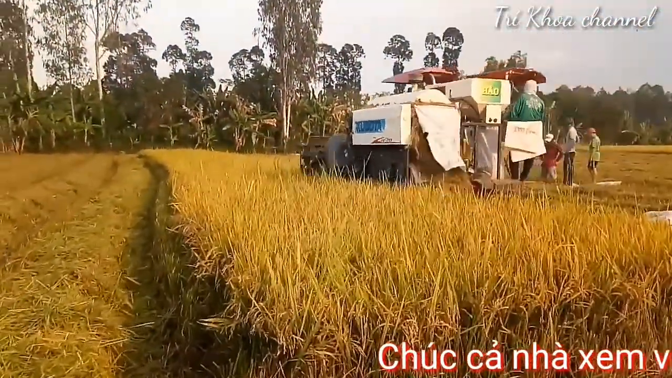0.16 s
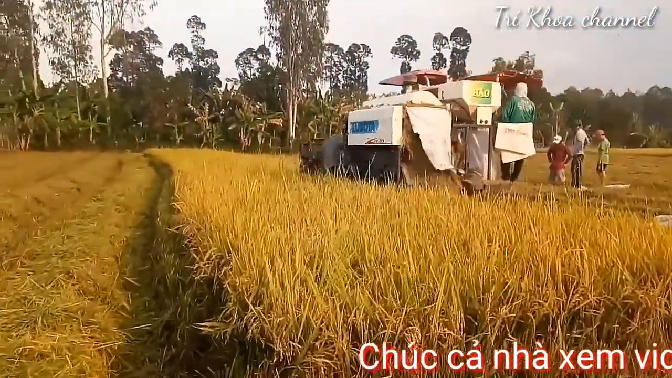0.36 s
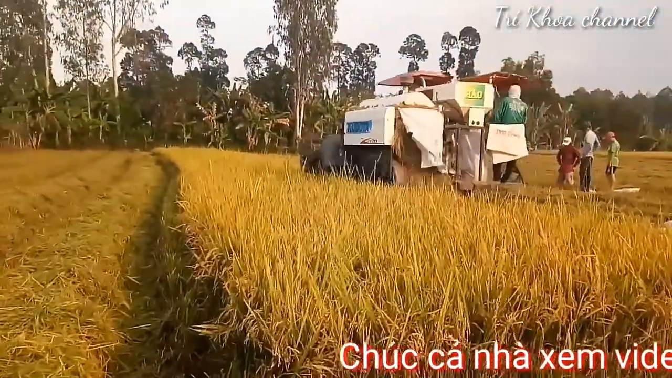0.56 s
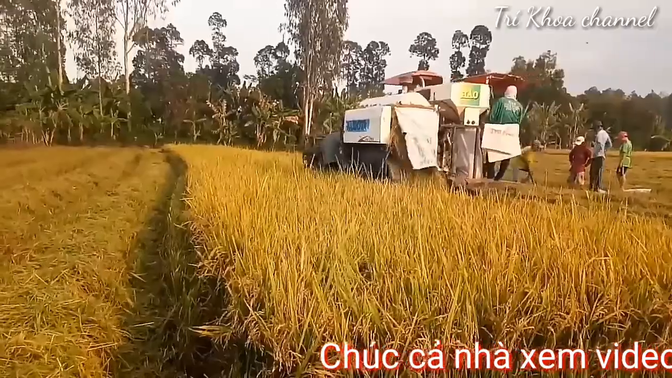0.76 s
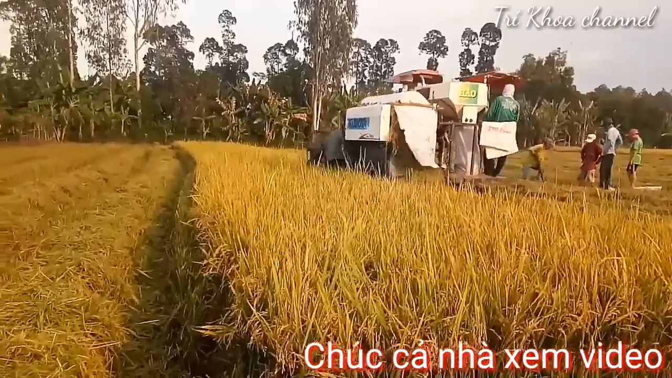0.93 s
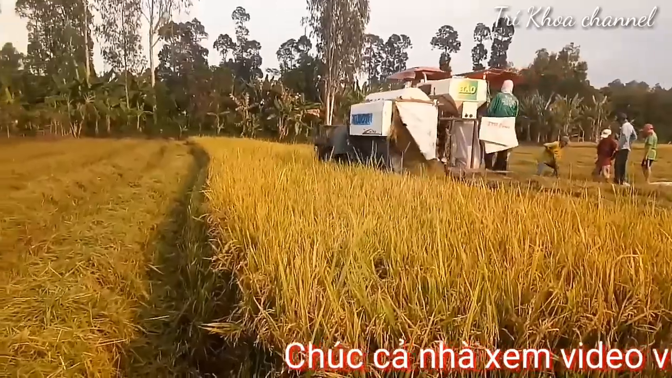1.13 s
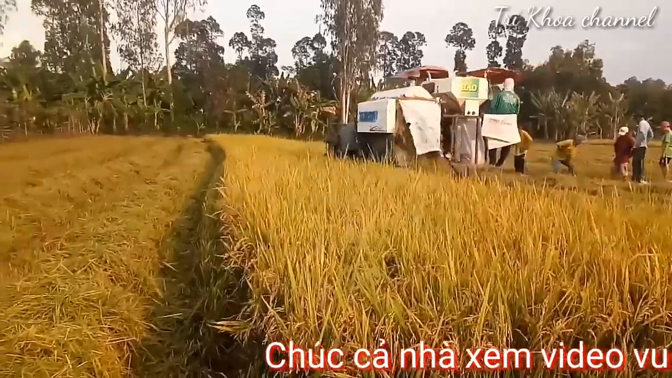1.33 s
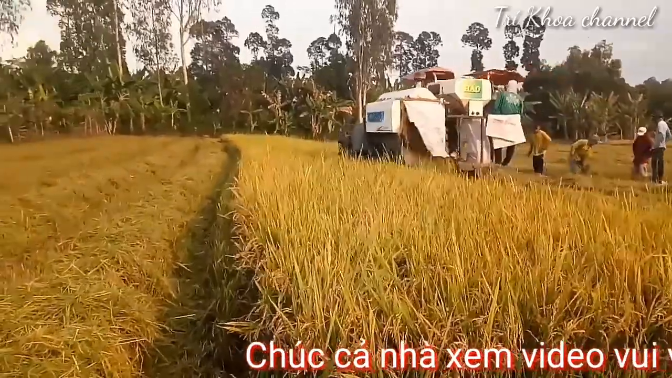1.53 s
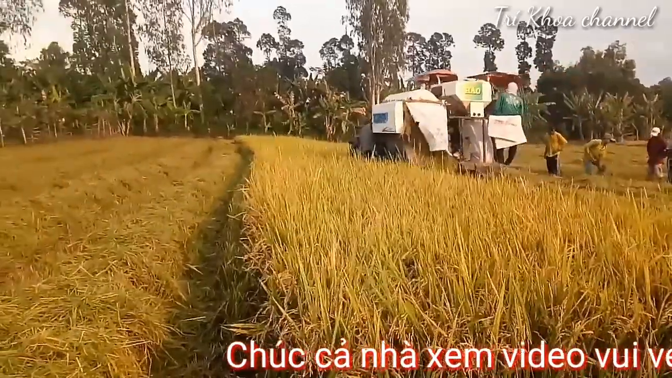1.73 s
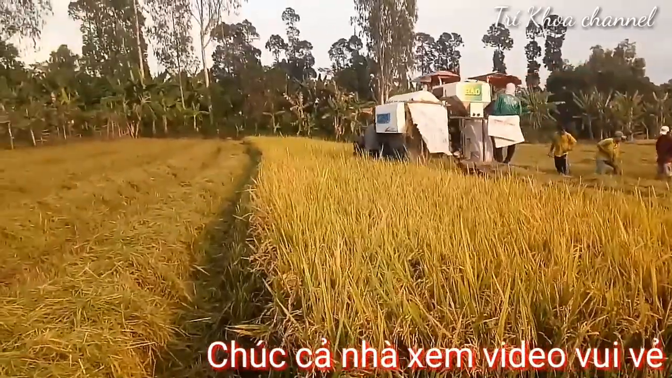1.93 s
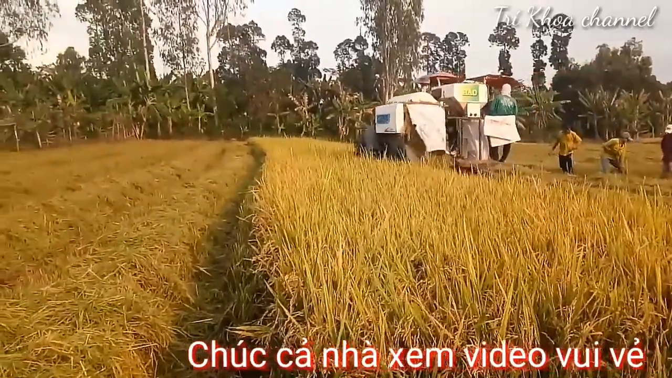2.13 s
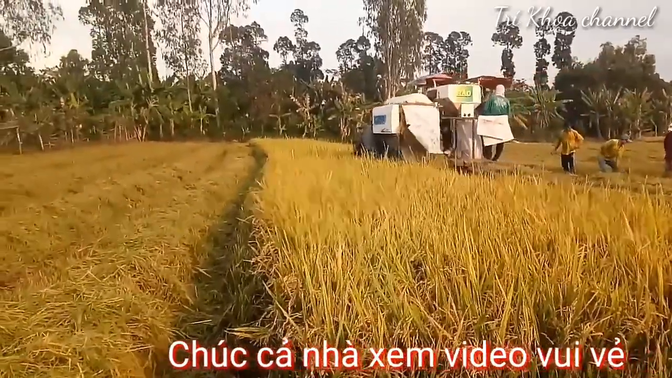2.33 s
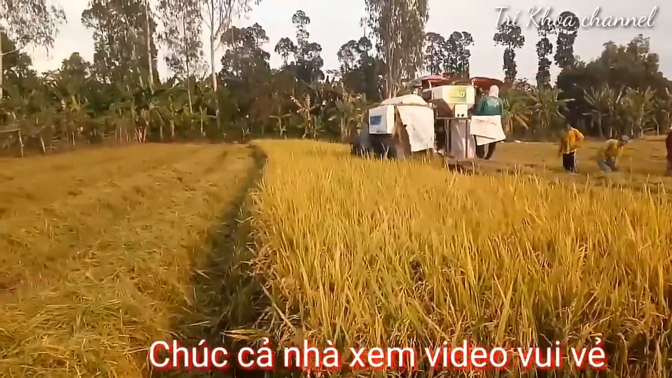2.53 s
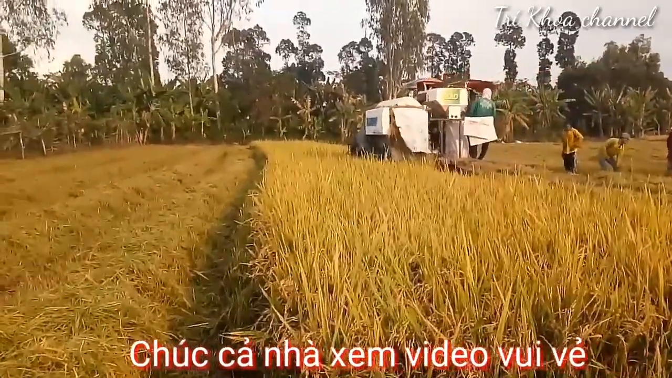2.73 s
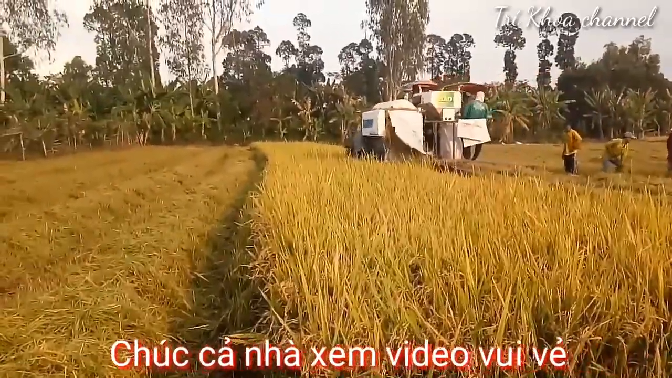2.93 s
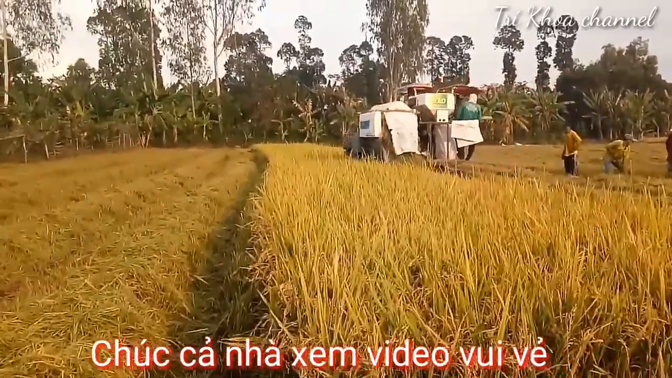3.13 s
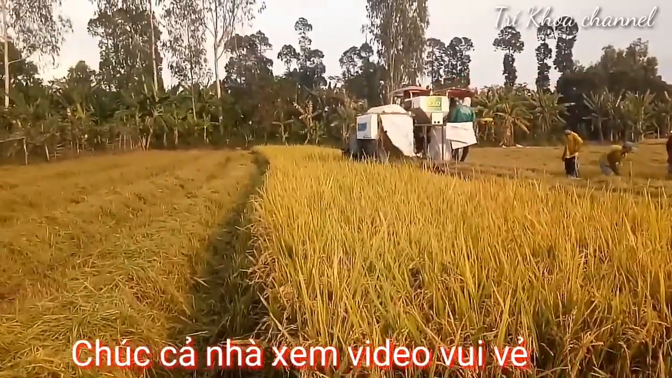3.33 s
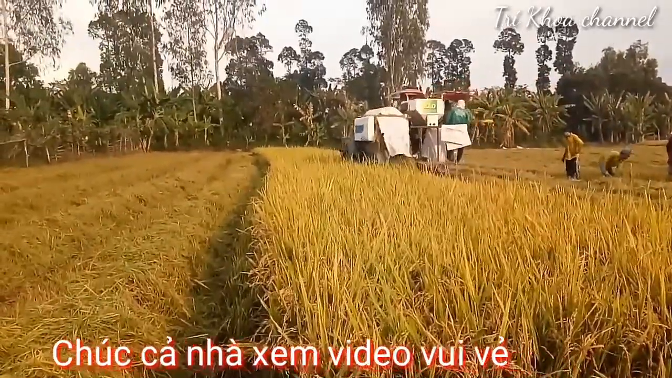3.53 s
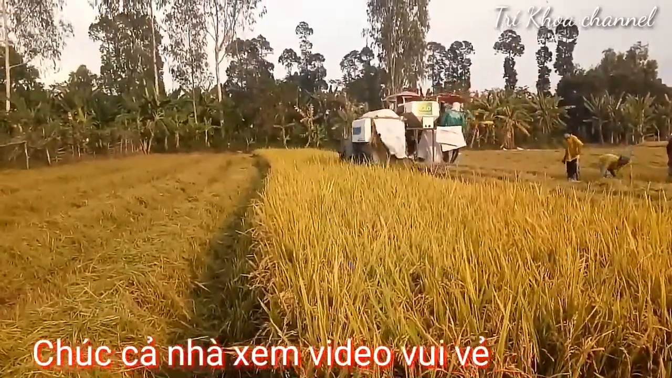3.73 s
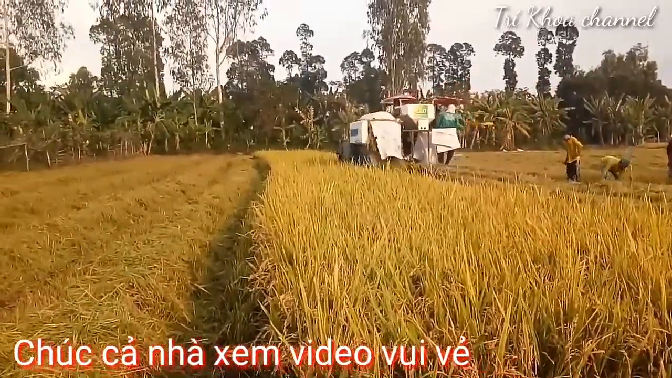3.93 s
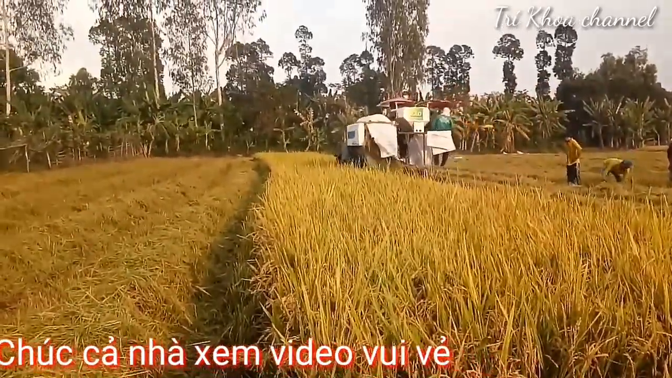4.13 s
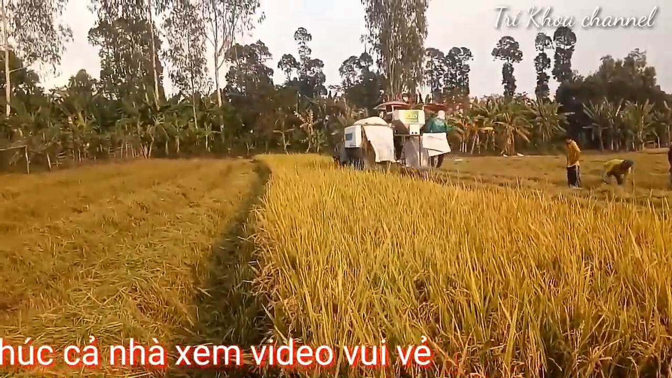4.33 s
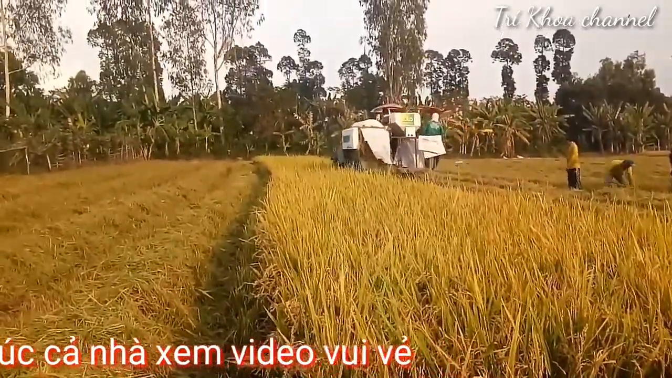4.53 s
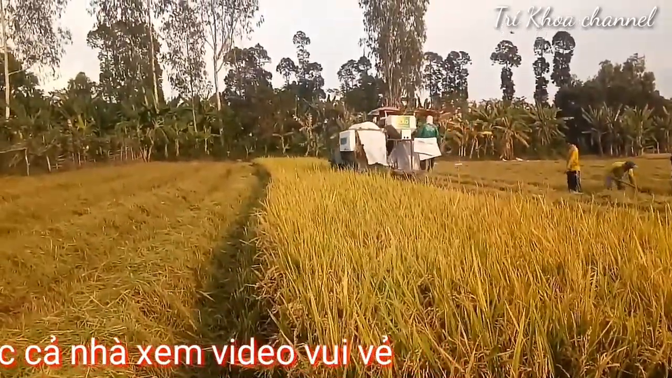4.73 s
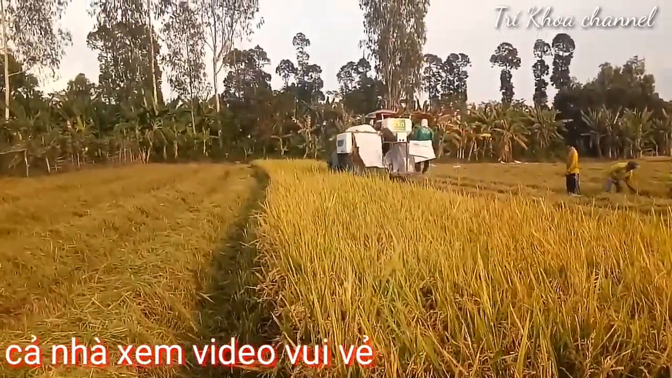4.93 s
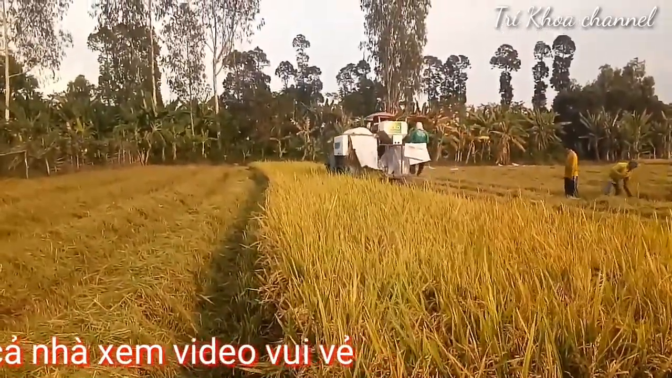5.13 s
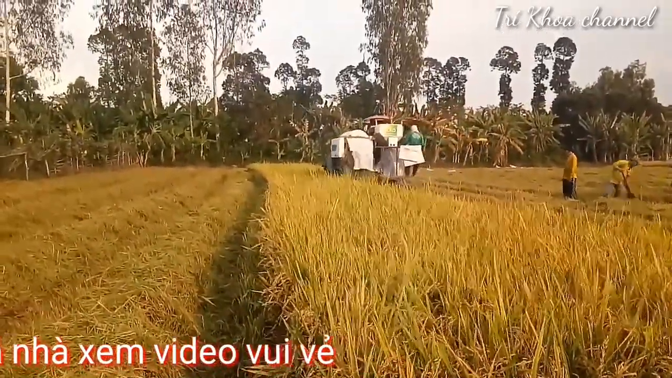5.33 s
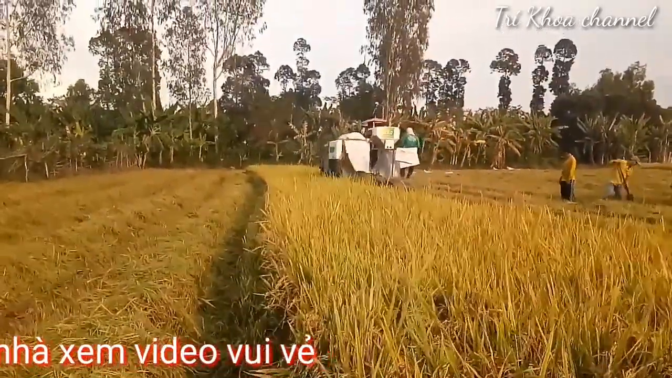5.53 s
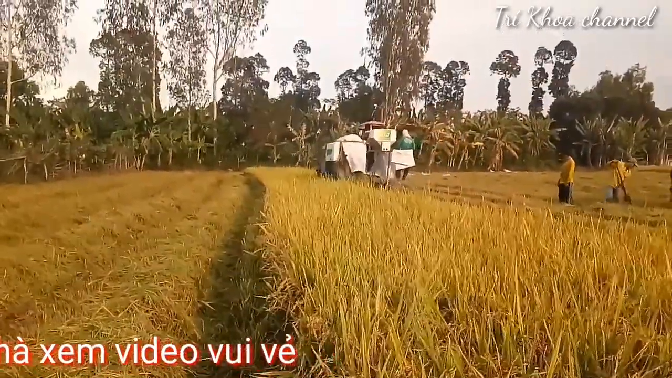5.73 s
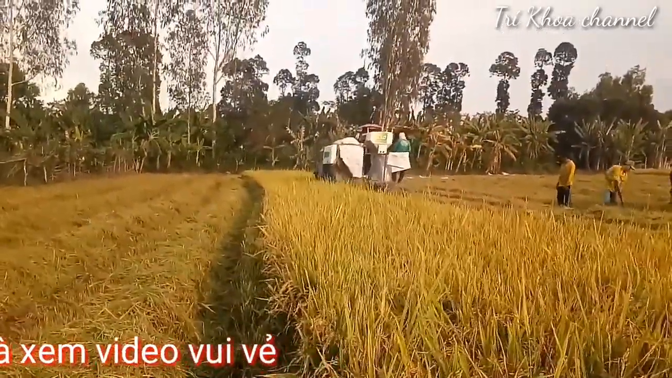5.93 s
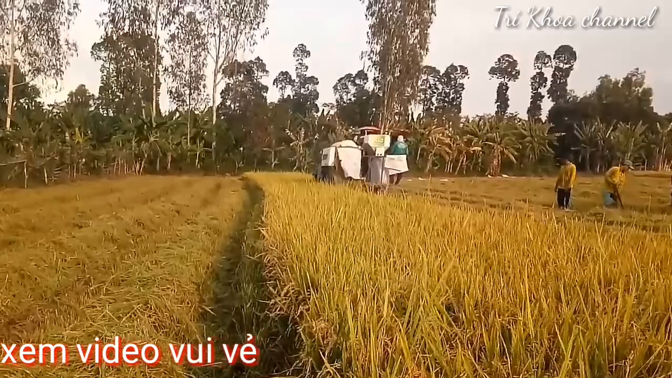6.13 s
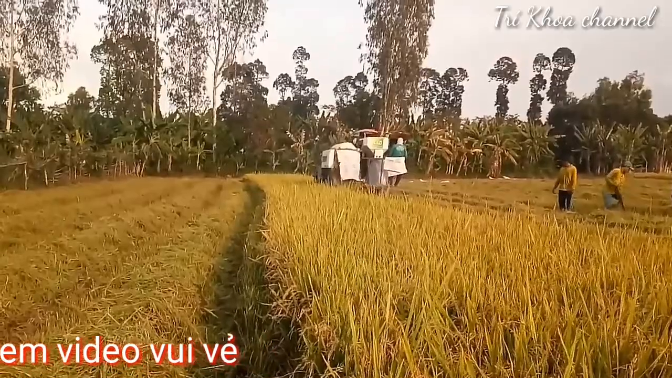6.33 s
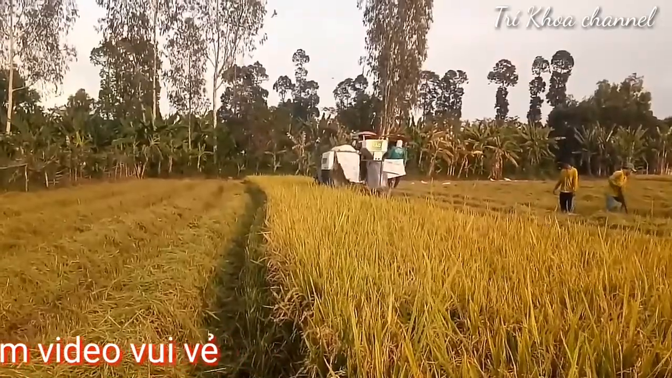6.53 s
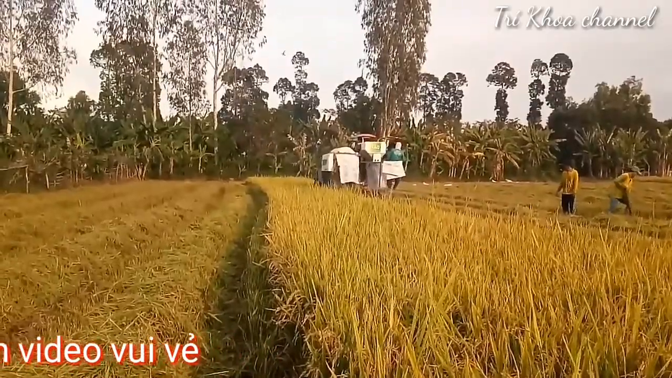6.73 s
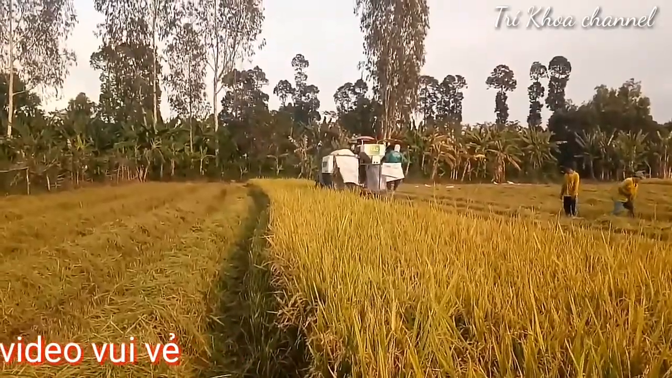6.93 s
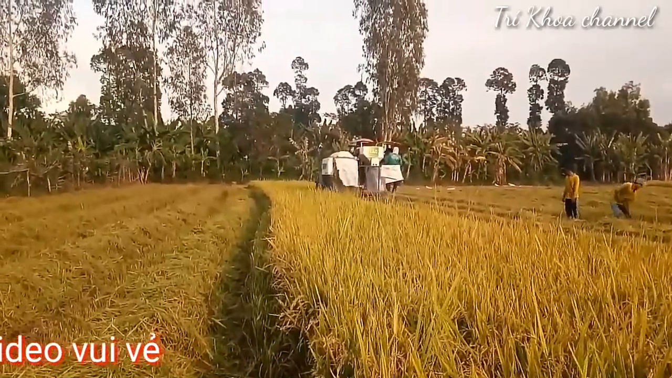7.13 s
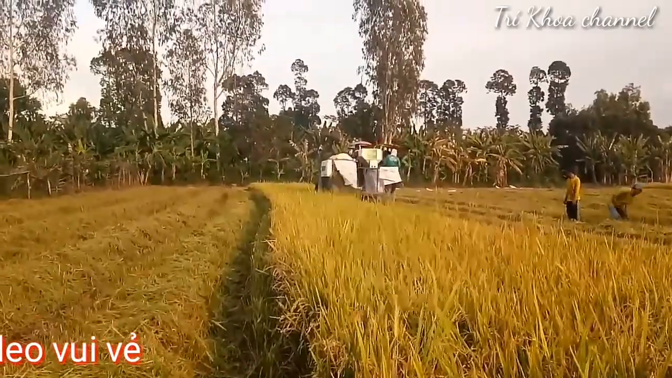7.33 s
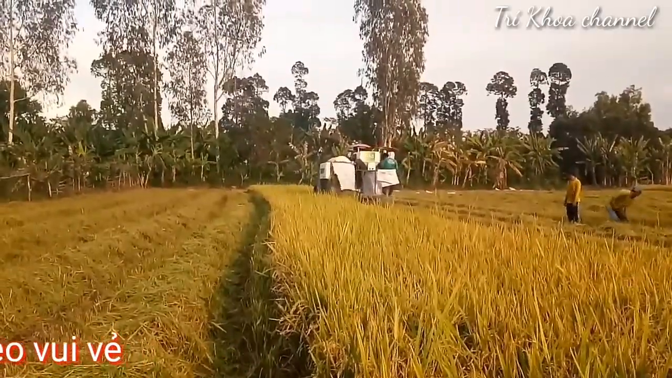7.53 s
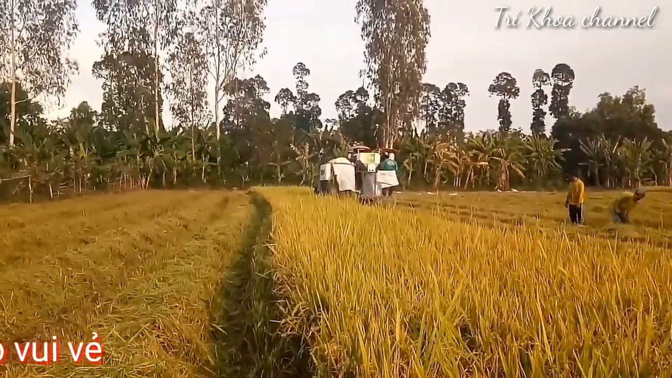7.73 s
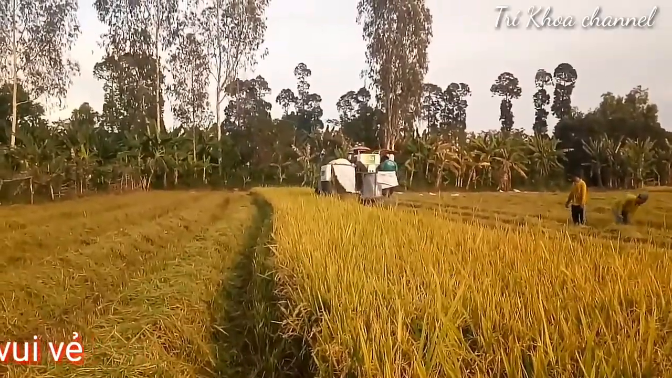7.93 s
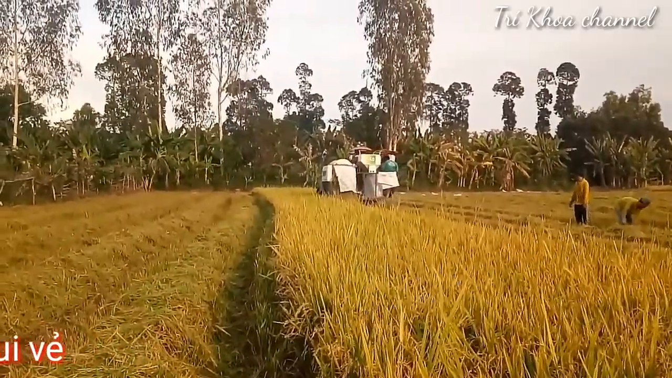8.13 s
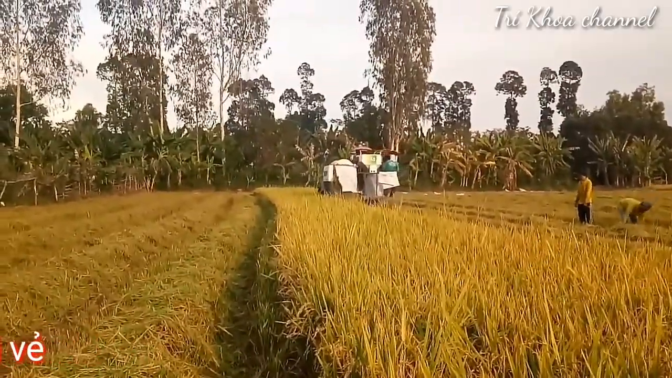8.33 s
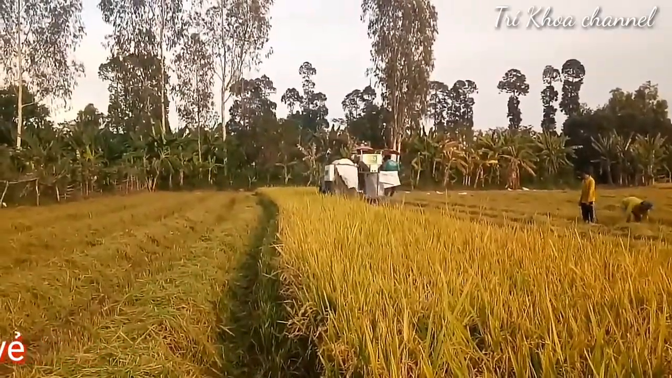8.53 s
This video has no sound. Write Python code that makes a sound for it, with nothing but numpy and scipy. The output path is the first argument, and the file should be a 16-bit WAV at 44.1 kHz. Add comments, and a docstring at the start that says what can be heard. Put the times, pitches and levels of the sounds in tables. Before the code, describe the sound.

Low diesel drone under a broad threshing roar and dense straw hiss; a shrill hiss stops midway while the harvester recedes across open field.

```python
"""At once a diesel drone sits under the broad roar of drum and fan: a combine harvester in a rice field.
Sine orders of a drifting firing rate make the drone; shaped, patchy noise makes rumble and roar.
Chaff hisses and rustles in finer noise bands, a shrill hiss swells and breaks off, stalks snap, the chassis jolts.
The machine fades as it drives away, and the body of whoever holds the mono microphone returns a short,
drifting echo that combs the middle frequencies."""
import sys
import numpy as np
from scipy import signal
from scipy.fft import rfft, irfft, next_fast_len
from scipy.io import wavfile
from scipy.ndimage import uniform_filter1d, map_coordinates

SR = 44100
rng = np.random.default_rng(int(sys.argv[2]) if len(sys.argv) > 2 else 0)


def wav_out(sig):
    """Save sig, one row per channel (or a flat mono array), as 16-bit PCM at SR to the path in sys.argv[1]."""
    wavfile.write(sys.argv[1], SR, np.round(np.clip(np.atleast_2d(sig).T, -1, 1) * 32767).astype(np.int16))


N = 382347  # samples

# Driving straight away
START_M, SPEED_M_PER_S = 18.1, 3.99

# Diesel: firing rate and its two lowest orders (t/s, f/Hz, level of order 1/dB, level of order 2/dB)
DRONE = [(0, 92.66, -30, -23.5), (.5, 92.2, -26.5, -20.5), (1, 92.6, -28, -21), (1.7, 90.5, -25, -20),
         (2.05, 89.54, -25.5, -21), (2.22, 89.8, -28, -28), (2.55, 88.9, -27, -26), (2.85, 87.2, -27, -30),
         (3.2, 85, -27.5, -31), (3.5, 85.14, -27, -24), (4.5, 84.96, -29, -23.5), (4.8, 84.4, -31, -24),
         (5.35, 84.2, -27, -25), (5.5, 83.6, -31, -27), (5.75, 84.2, -30.5, -39), (6.02, 86.7, -30, -27.5),
         (6.25, 85.9, -30, -34), (6.5, 84.6, -35, -33), (6.75, 83.6, -34, -37), (7.5, 83.9, -34, -33),
         (8, 88.6, -31.5, -39), (8.45, 90.65, -32, -31), (8.67, 90.3, -30, -29)]
# Orders and a gear whine that the housing lifts (multiple of the firing rate)
LIFTED_ORDERS = (1.5, 3, 4, 7.07)
# Housing resonance for each lifted order (f/Hz, width/Hz, level at the start distance/dB)
HOUSING = [(129, 7, -29.5), (253.8, 5.2, -30.5), (364, 8.5, -40.5), (658, 34, -33)]
# Belts and gears (multiple of the firing rate, level re order 1/dB)
BELTS_AND_GEARS = [(2.5, -15.5), (6.13, -16.5), (7.42, -15), (8, -25.5), (8.45, -14)]

# Swells of the working machine (t/s, roar level/dB, bass level/dB)
WORK = [(0, -1.5, -0.5), (1, 0.9, -2.5), (1.7, 0.3, 0), (2.3, 1.5, 1), (3.2, 1.5, 1), (4.2, 0.5, 1),
        (4.8, 0, 1), (5.7, 0.5, 1), (6.7, -0.5, -1), (8.67, 0, 0)]
# Spectrum of tracks and drum (f/Hz, relative level per Hz/dB)
RUMBLE_SPECTRUM = [(11, -26), (18, -12), (30, -13.5), (47, -24), (62, -14.5), (100, -7), (125, -4),
                   (150, 0), (200, -1), (230, -8), (265, -7.5), (300, -30), (500, -31)]
# Spectrum of the roar (f/Hz, relative level per Hz/dB)
ROAR_SPECTRUM = [(150, -24), (300, -4.5), (370, -1), (450, -1.5), (540, 0), (650, -0.5), (800, -3),
                 (1000, -6), (1400, -5.5), (1800, -7.5), (2200, -9), (3000, -16.5), (4000, -9), (6000, -41)]
RUMBLE_DB, ROAR_DB = -24, -23  # at the start distance, before the swells
RUMBLE_FADES = 0.57  # share of the distance loss: the bass fades slower than the rest
ROAR_TREBLE_DB_PER_S = 0.32  # the roar brightens as the machine leaves

# Straw passing through (t/s, straw level/dB, fizz level/dB)
FEED = [(0, 0, -.5), (.3, 0.5, 0), (.6, -2, -1), (1, -1, -4), (1.75, 1, 2.5), (2.1, 1.5, -1), (3, 0, 1),
        (3.6, 1, 0), (4.3, -2, -3), (4.75, -2, -5), (5.1, -1, 0), (5.8, .5, 3.5), (6.45, 2, 4),
        (6.9, 0, -2), (7.6, -1, -1), (8.67, 1, 2)]
# Hiss, rustle and fizz, one row each (start level before the feed/dB, multiple of the distance loss)
CHAFF_LEVELS = [(-20.5, 0.63), (-29, 1.375), (-32.5, 1.15)]
# Spectrum of the hiss (f/Hz, relative level per Hz/dB)
HISS_SPECTRUM = [(1800, -31.5), (3000, -18), (3400, -17.5), (3750, -14), (4100, -8.5), (4800, -2.5),
                 (5200, 2), (5500, 1), (6200, -6.5), (6700, -10), (6950, -21), (7600, -21.5), (8100, -34),
                 (10000, -50)]
# Spectrum of the rustle (f/Hz, relative level per Hz/dB)
RUSTLE_SPECTRUM = [(6500, -16), (8100, -9.5), (8800, -2.5), (9600, 0.5), (10500, -1), (12000, -3),
                   (13100, -13.5), (14000, -14)]
# Spectrum of the fizz (f/Hz, relative level per Hz/dB)
FIZZ_SPECTRUM = [(11000, -18), (13000, -8), (13900, -10), (14400, -1), (14700, 1), (15100, -3), (15600, 1)]
HISS_SWING = 0.85  # the hiss follows the feed less than the rustle
RUSTLE_TOP_DB_PER_S = 0.38  # the top of the rustle gains as the machine leaves
DRUM_RATIO = 4.6  # firings per turn of the drum

# Swells and dips of the shrill hiss (t/s, width/s, level/dB, extra level above 7.8 kHz/dB)
SHRILL_SWELLS = [(.5, 0.14, 3.5, -5), (.95, 0.072, 1, 8), (1.55, 0.2, -7, -1), (2, .12, -7, 9),
                 (4.4, .3, 0, 2), (4.951, 0.25, 1, 20)]
# Spectrum of the shrill hiss (f/Hz, relative level per Hz/dB)
SHRILL_SPECTRUM = [(4500, -28), (5200, -1), (5700, 4.5), (6300, -2), (6800, -8), (7600, -15), (8300, -16),
                   (9500, -27)]
SHRILL_DB = -25.5  # before swells and break
BREAK_S, BREAK_WIDTH_S, BREAK_DB = 4.76, 0.085, -21

# Body behind the microphone (t/s, lag/ms, posture from 0 up, numbering the trains below)
BODY = [(0, 1.3, 0.59), (.3, 1.4, 0.31), (.95, 1.17, 0), (1.3, 1.32, 0.045), (1.8, 1.25, 0.69),
        (2.55, 1.56, 0.99), (3.3, 1.51, 1), (4.5, 1.6, 1.2), (5.2, 1.604, 1.2), (5.6, 1.6, 1.3),
        (5.85, 1.65, 2.4), (8.67, 1.58, 2)]
# Later copies (delay after the first/ms, strength in posture 0, in posture 1, in posture 2)
LATER_COPIES = [(.3, -0.2, 0.025, 0.06), (.47, -0.1, -0.11, 0.047), (.75, -0.064, 0.053, -0.031),
                (1.03, -.19, -0.1, -0.053), (1.25, 0.1, 0.089, -0.032), (1.45, -0.094, -0.23, -0.045),
                (1.66, 0.24, 0.1, .01), (1.9, 0.023, 0.024, -0.03), (2.2, -0.14, -0.042, -0.0043),
                (2.48, 0.034, 0.05, 0.003)]
FIRST_COPY = 0.26  # share of the direct sound, before the echo's band limits

# Stalks snapping (t/s, level before an 8 dB trim/dB)
SNAPS = [(0.7394, -18), (0.9434, -19), (1.0444, -18), (1.1742, -19), (1.502, -13), (1.7394, -25),
         (2.6179, -17), (4.6202, -21)]
# Jolts of the chassis (t/s, level before the attack and decay/dB)
JOLTS = [(2.397, -20), (6.286, -8)]

TOP_HZ = 15510  # band limit of the microphone signal


def amp(db):
    """Gain of a level in dB."""
    return 10 ** (np.asarray(db) / 20)


def unit(x):
    """Scaled to rms 1."""
    return x / np.sqrt(np.mean(x ** 2) + 1e-20)


def curves(rows):
    """One value per sample for each column after the time."""
    s, *cols = np.transpose(rows)
    return [np.interp(np.arange(N) / SR, s, c) for c in cols]


def wobble(rate):
    """A smooth random curve, rate knots a second."""
    at = np.arange(0, N + 16, 16)
    knots = rng.standard_normal(int(N * rate / SR) + 4)
    return np.interp(np.arange(N), at, map_coordinates(knots, [at * rate / SR]))


def filtered(x, response):
    """x times a response of frequency."""
    m = next_fast_len(N + 8192)
    return irfft(rfft(x, m) * response(np.fft.rfftfreq(m, 1 / SR)), m)[..., :N]


def coloured(x, points):
    """x shaped by a spectrum of (f/Hz, level/dB), rms 1."""
    f, db = np.transpose(points)
    return unit(filtered(x, lambda hz: amp(np.interp(np.log(hz + 1), np.log(f), db, left=-120, right=-120))))


def shelf(x, edge_hz, below_db, above_db):
    """Separate, moving gains under and over an edge."""
    low = filtered(x, lambda hz: 1 / (1 + (hz / edge_hz) ** 8))
    return amp(below_db) * low + amp(above_db) * (x - low)


def rush(points, patchy_db, grit_db):
    """Noise with patches of random gain in time and frequency; grit makes single grains stand out."""
    gritty = rng.standard_normal(N) * amp(grit_db * wobble(350))
    bins = signal.stft(gritty, nperseg=512)[2]
    field = uniform_filter1d(uniform_filter1d(rng.standard_normal(bins.shape), 8, 0), 8, 1)
    patchy = signal.istft(bins * amp(patchy_db * unit(field)), nperseg=512)[1][:N]
    return coloured(patchy, points)


def distance_db():
    """Spreading loss as the machine leaves."""
    return -20 * np.log10(1 + SPEED_M_PER_S * np.arange(N) / SR / START_M)


def firing_angle():
    """Phase of the firing cycle in radians."""
    return 2 * np.pi * np.cumsum(curves(DRONE)[0]) / SR


def engine():
    """Orders of the firing rate; uneven burns and moving air shake their size and phase."""
    angle = firing_angle()
    rate_hz, first_db, second_db = curves(DRONE)
    orders = [(1, first_db), (2, second_db)]
    for k, (hz, width, db) in zip(LIFTED_ORDERS, HOUSING):
        resonance_db = -10 * np.log10(1 + ((k * rate_hz - hz) / width) ** 2)
        orders.append((k, db + distance_db() + resonance_db))
    orders += [(k, first_db + db) for k, db in BELTS_AND_GEARS]
    out = np.zeros(N)
    for k, db in orders:
        size = np.sqrt(2) * amp(db + 0.58 * np.sqrt(k) * wobble(7))
        shaken = angle + 0.028 * np.sqrt(k) * wobble(16)
        out += size * np.sin(k * shaken + 6 * rng.random())
    return out


def machine():
    """Low rumble of tracks and drum, and a roar that puffs a little with each firing."""
    swell_db, bass_db = curves(WORK)
    rumble_db = RUMBLE_DB + RUMBLE_FADES * distance_db() + bass_db + 0.47 * wobble(2.003)
    rumble = amp(rumble_db) * rush(RUMBLE_SPECTRUM, patchy_db=1.06, grit_db=-1.3)
    roar = shelf(rush(ROAR_SPECTRUM, patchy_db=0.97, grit_db=0.2), 410, bass_db, 0)
    roar = shelf(roar, 2420, 0, ROAR_TREBLE_DB_PER_S * np.arange(N) / SR)
    puffs = 1 + 0.028 * np.cos(firing_angle())
    return rumble + amp(ROAR_DB + distance_db() + swell_db) * puffs * roar


def chaff():
    """Straw and chaff blown out: hiss, grainy rustle and fizz share bursts and the turn of the drum."""
    feed_db, fizz_swing_db = curves(FEED)
    hiss_db, rustle_db, fizz_db = [db + far * distance_db() for db, far in CHAFF_LEVELS]
    drum = np.cos(firing_angle() / DRUM_RATIO)  # the threshing drum throws straw once a turn
    bursts = wobble(12) + 0.98 * wobble(30) + 0.5 * drum
    hiss = rush(HISS_SPECTRUM, patchy_db=0.4, grit_db=0.7)
    hiss *= amp(hiss_db + HISS_SWING * feed_db + 0.37 * bursts)
    top_db = RUSTLE_TOP_DB_PER_S * np.arange(N) / SR - 1.0
    rustle = shelf(rush(RUSTLE_SPECTRUM, patchy_db=0.86, grit_db=0.64), 12200, 0, top_db)
    rustle *= amp(rustle_db + feed_db + 0.37 * bursts)
    fizz = rush(FIZZ_SPECTRUM, patchy_db=0.8, grit_db=0.8)
    fizz *= amp(fizz_db + fizz_swing_db + 0.45 * bursts)
    return hiss + rustle + fizz


def shrill():
    """A higher hiss whose level swells and dips a few times and then breaks off."""
    t = np.arange(N) / SR
    s, width, db, top_db = np.transpose(SHRILL_SWELLS)
    bumps = np.exp(-((t - s[:, None]) / width[:, None]) ** 2)
    break_off_db = BREAK_DB * (1 + np.tanh((t - BREAK_S) / BREAK_WIDTH_S)) / 2
    level_db = SHRILL_DB + db @ bumps + break_off_db + 0.44 * wobble(18)
    return amp(level_db) * shelf(rush(SHRILL_SPECTRUM, patchy_db=1.05, grit_db=1.5), 7800, 0, top_db @ bumps)


def near_echo(x):
    """Adds copies at a drifting lag; the body is too uneven to mirror the treble, too small for the bass."""
    lag_ms, posture = curves(BODY)
    ms, *strengths = np.transpose(LATER_COPIES)

    def body(hz):
        return 1 / (1 + (hz / 4300) ** 6) / (1 + (120 / (hz + 1)) ** 2)

    def trains(hz):
        delays = np.exp(-2j * np.pi * np.outer(ms, hz) / 1000)
        return body(hz) * (np.array(strengths) @ delays)

    def late(y):
        return np.interp(np.arange(N) - lag_ms * SR / 1000, np.arange(N), y)

    out = x + FIRST_COPY * late(filtered(x, body))
    # each posture has its own train of small copies; neighbours crossfade
    for k, train in enumerate(filtered(x, trains)):
        out = out + np.clip(1 - abs(posture - k), 0, 1) * late(train)
    return out


def snaps():
    """Stalks snapping: bright noise let through in short decaying cracks."""
    cracks, t = np.zeros(N + SR), np.arange(SR // 50) / SR
    for s, db in SNAPS:
        cracks[round(s * SR):][:len(t)] += amp(db - 8 - 60 * t / 0.018)  # falls 60 dB in 18 ms
    bright = [(3000, -20), (6000, 4), (8000, -8), (10000, -12), (15500, 0)]  # (f/Hz, level/dB)
    return cracks[:N] * coloured(rng.standard_normal(N), bright)


def jolts():
    """Each jolt of the chassis is a low push that rings for a few cycles."""
    out, t = np.zeros(N + SR), np.arange(SR // 10) / SR
    attack = 1 - np.exp(-t / 0.0033)
    for s, db in JOLTS:
        decay = amp(db - 60 * t / 0.096)  # falls 60 dB in 96 ms
        out[round(s * SR):][:len(t)] += decay * attack * np.sin(2 * np.pi * 145 * t)
    return out[:N]


def scene():
    """The noisy layers and snaps also return by the echo; engine and jolts arrive only directly."""
    mono = engine() + near_echo(machine() + chaff() + shrill() + snaps()) + jolts()
    return np.array([mono, mono])


def record(dry):
    """Nothing is kept above the band limit."""
    return filtered(dry, lambda hz: hz < TOP_HZ)


dry = scene()
out = record(dry)
wav_out(out)
```